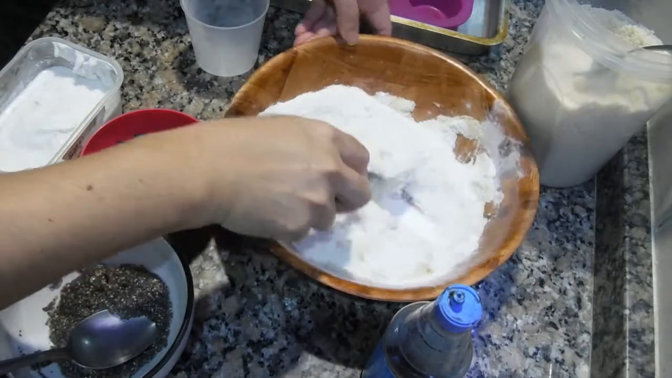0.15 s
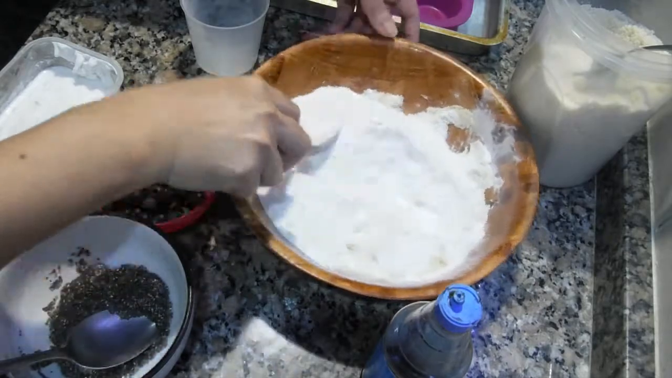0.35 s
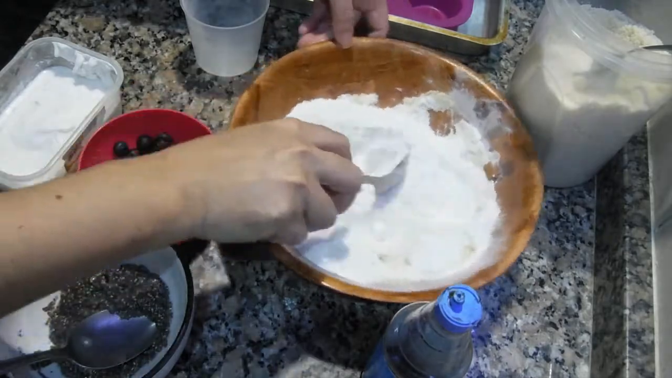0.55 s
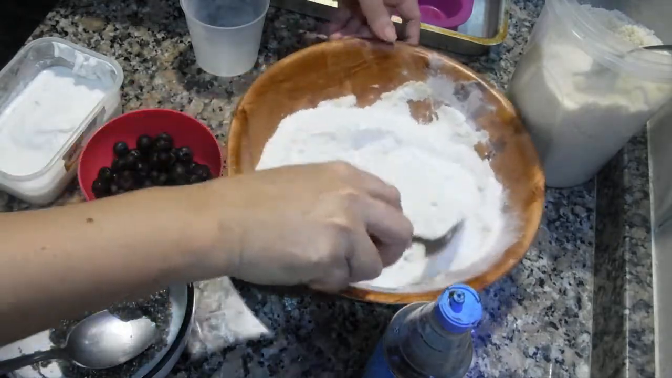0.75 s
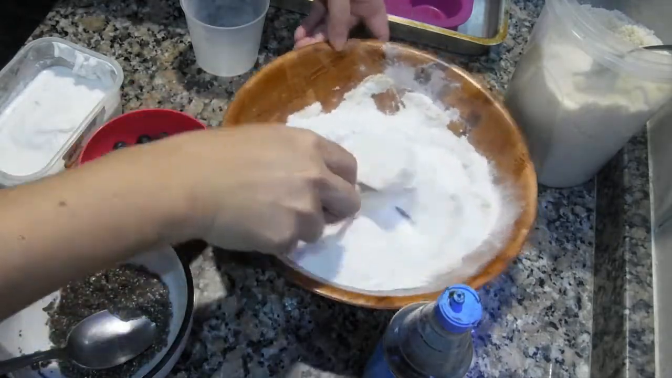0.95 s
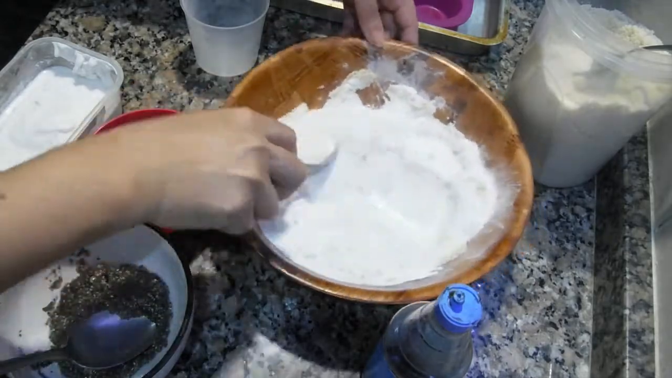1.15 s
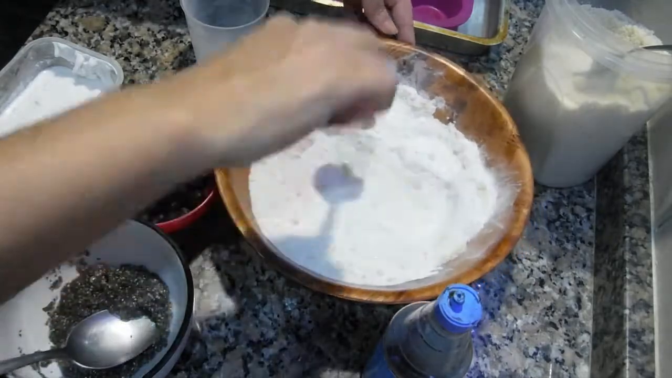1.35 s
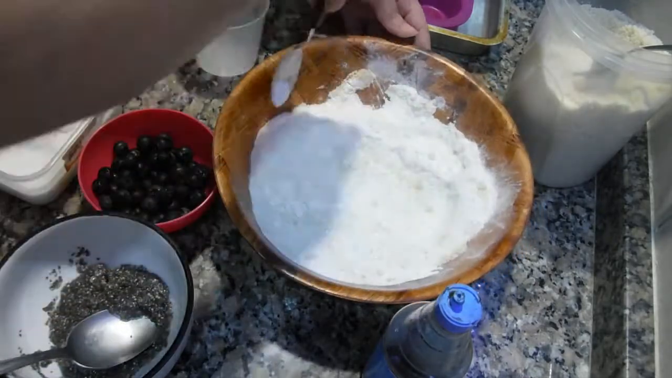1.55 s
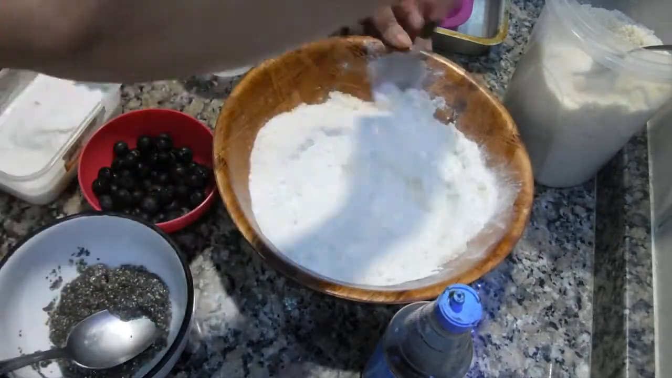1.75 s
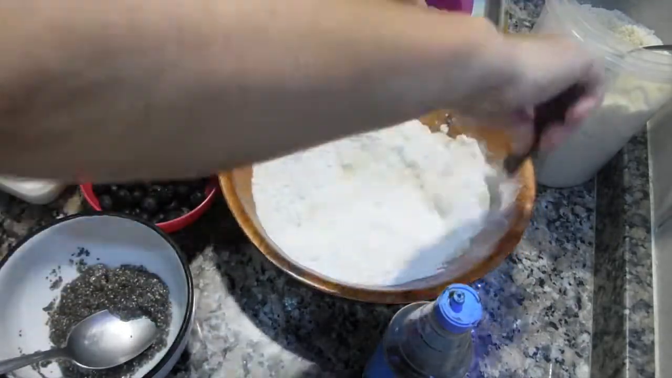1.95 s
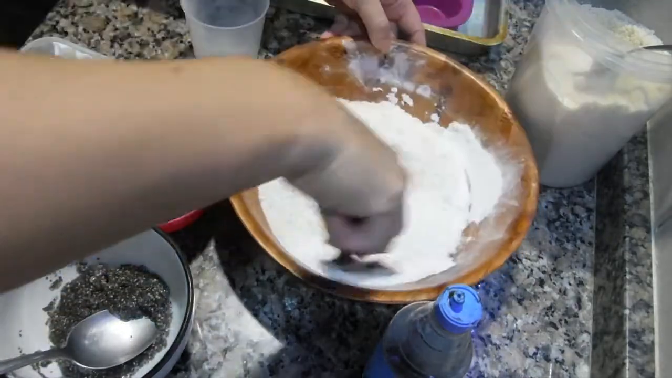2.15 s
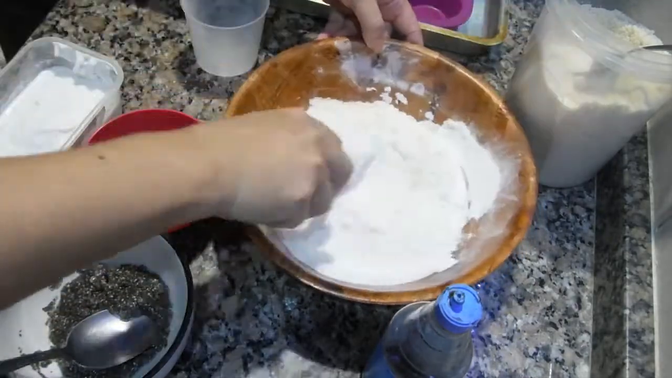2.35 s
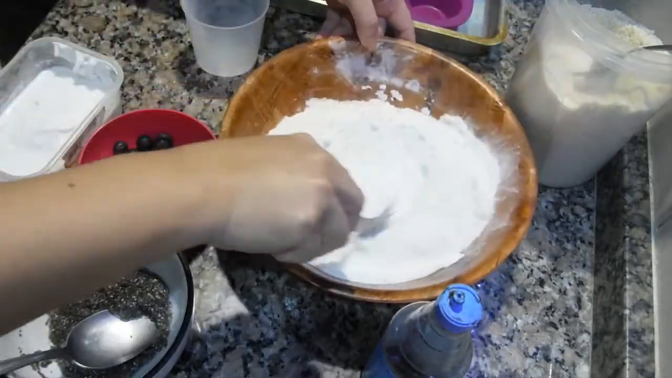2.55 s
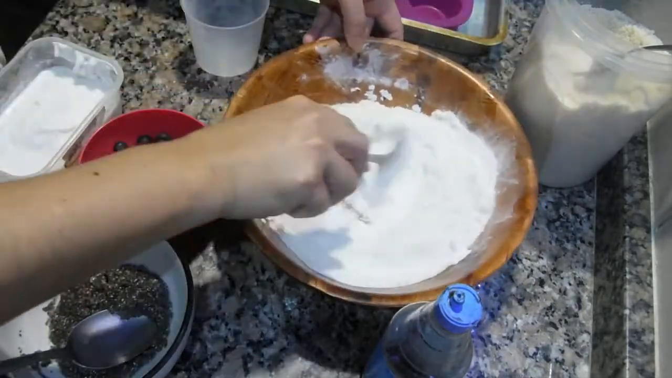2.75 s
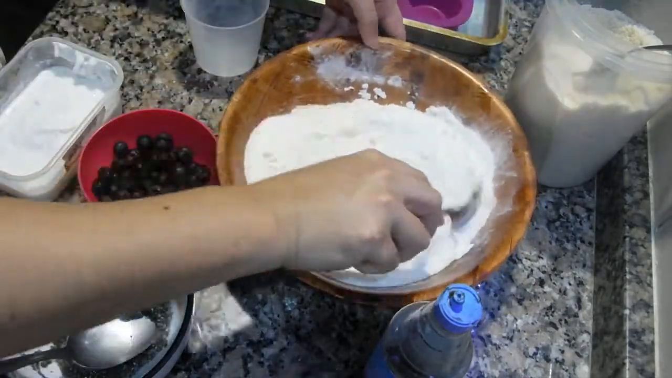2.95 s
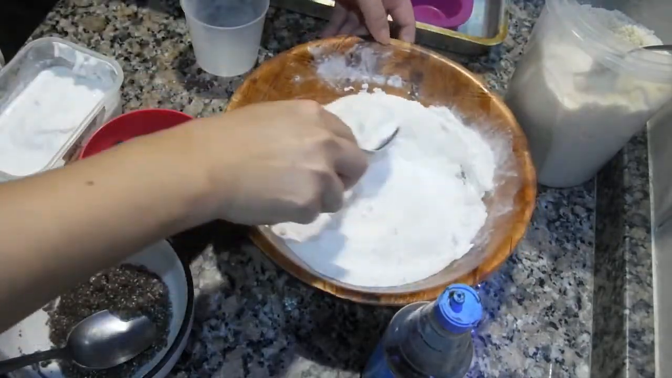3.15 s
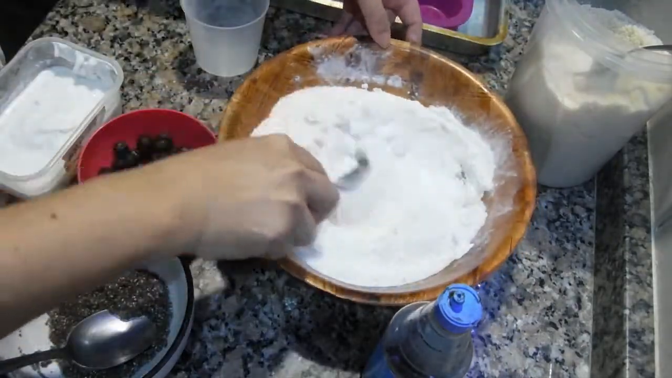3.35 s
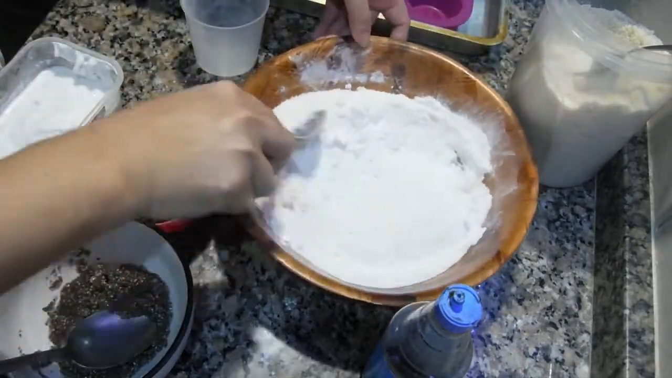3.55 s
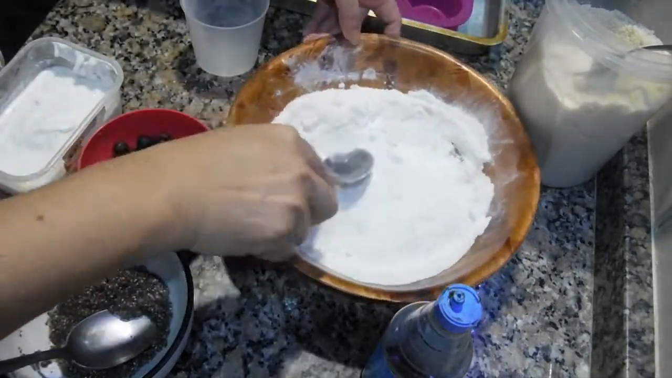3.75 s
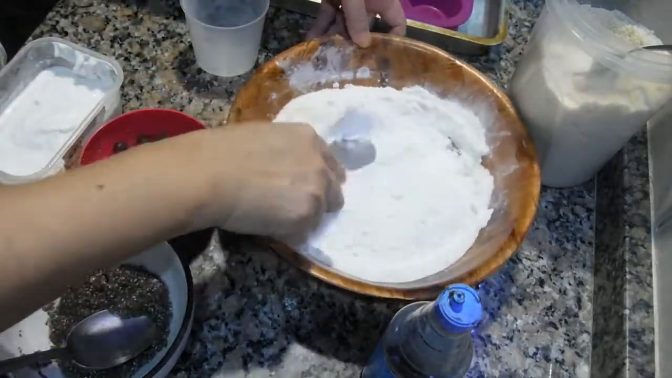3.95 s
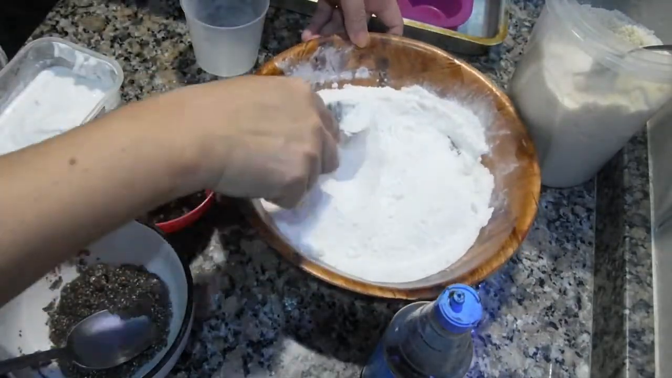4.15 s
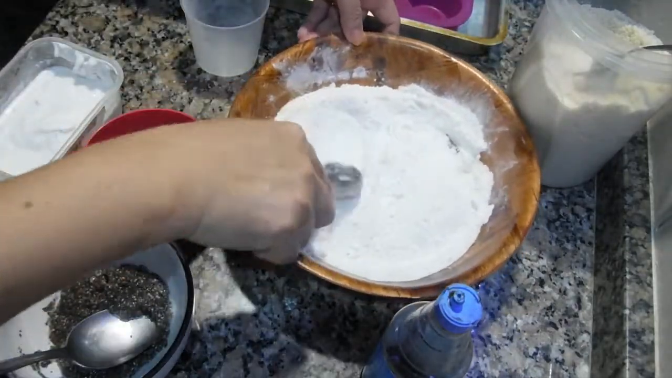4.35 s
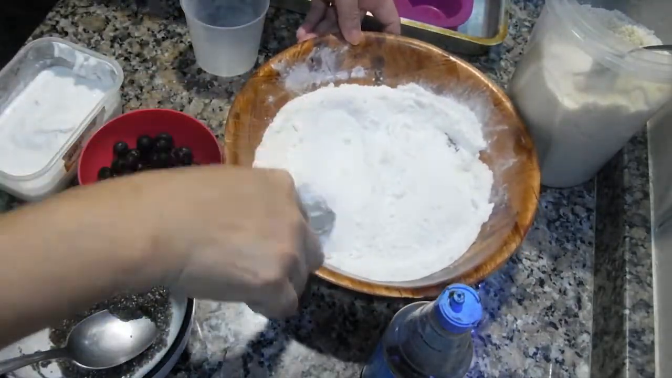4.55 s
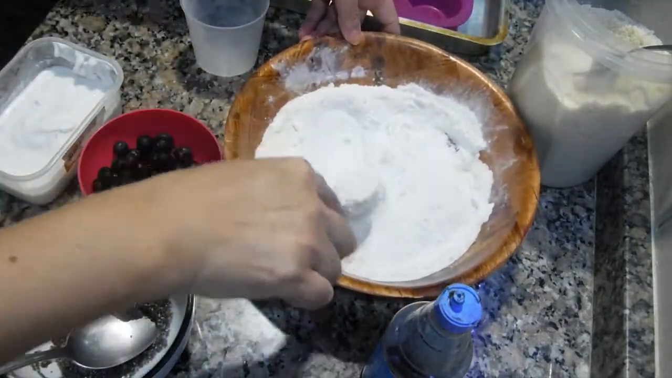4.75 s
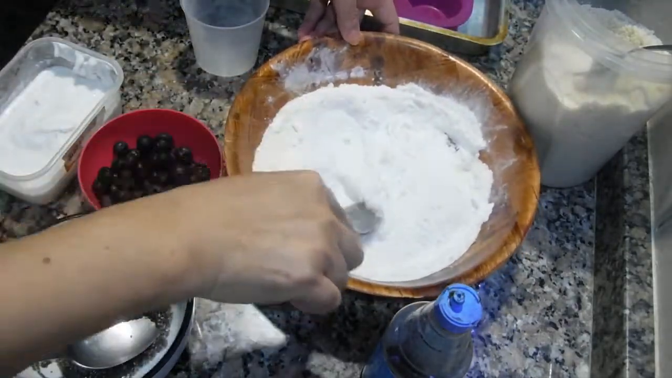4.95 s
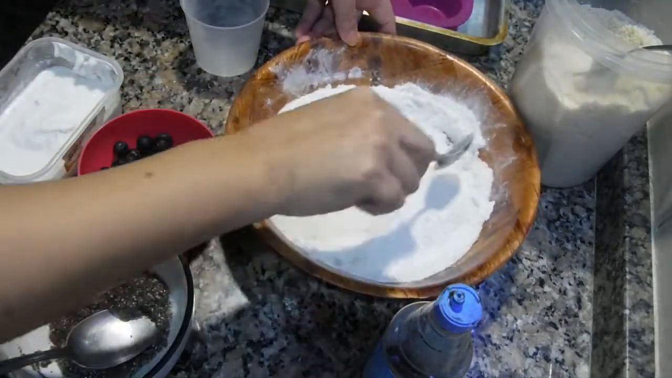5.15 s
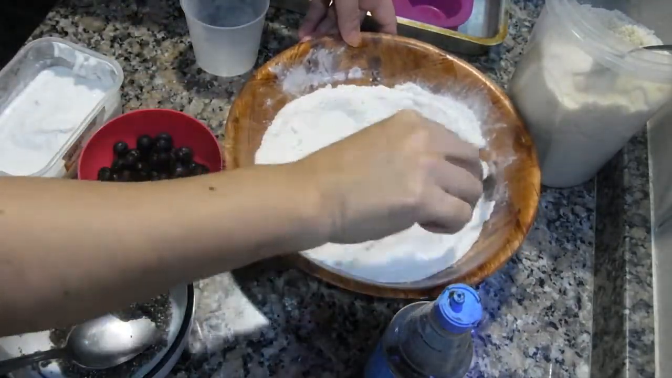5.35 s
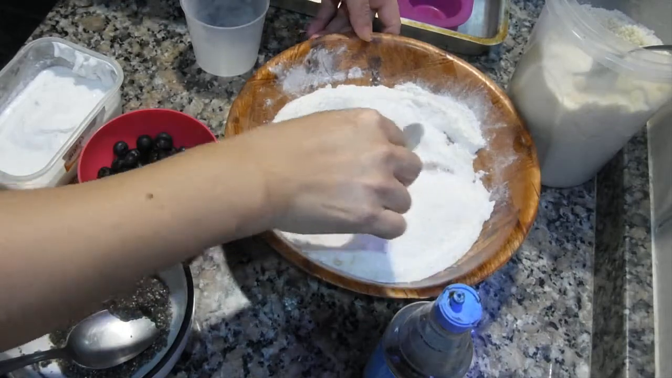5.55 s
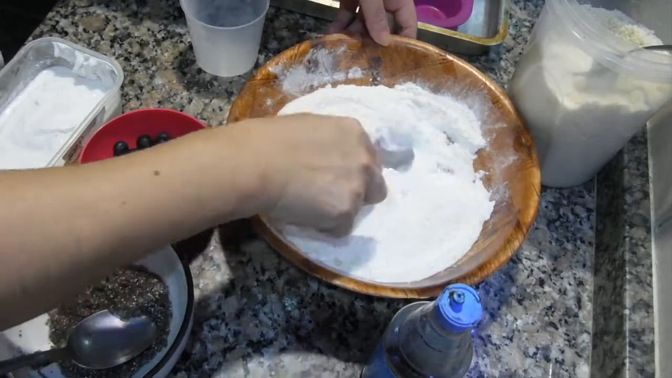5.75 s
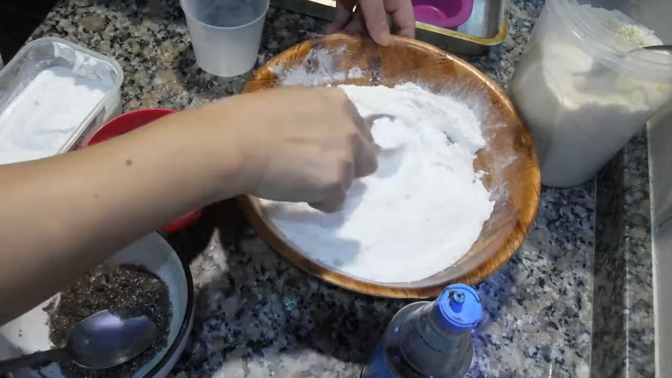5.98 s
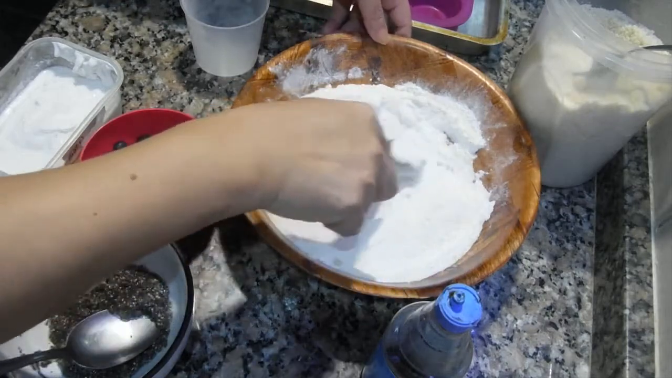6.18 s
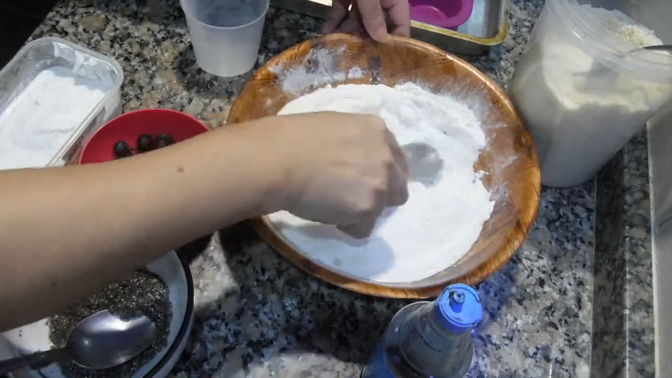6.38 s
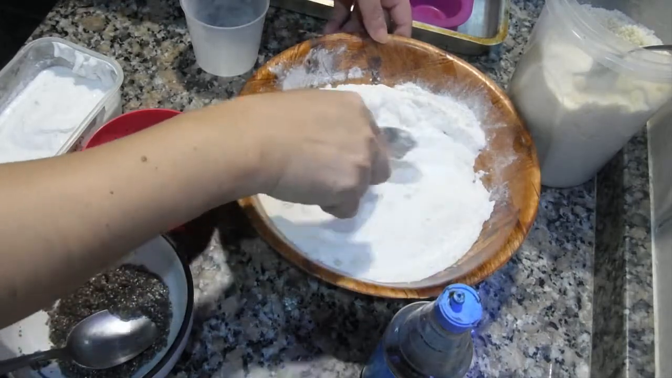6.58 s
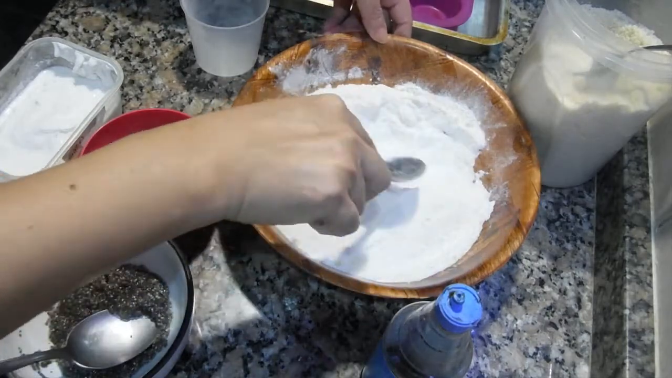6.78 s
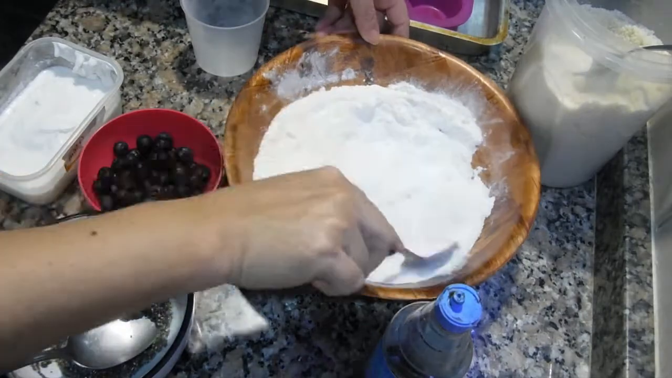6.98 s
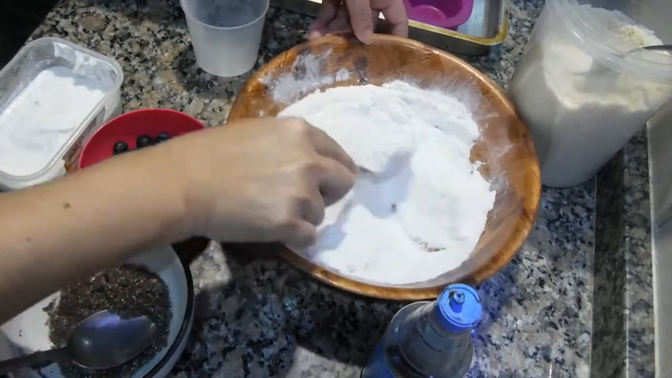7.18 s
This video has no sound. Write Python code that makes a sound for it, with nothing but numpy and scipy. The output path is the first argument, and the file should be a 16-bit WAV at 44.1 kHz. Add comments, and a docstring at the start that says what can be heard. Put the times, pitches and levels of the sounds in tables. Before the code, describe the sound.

Close, irregular steel-on-wood clicks and gritty scrapes, one long rough sweep around the bowl, powdery flour hiss, and quiet room noise beneath.

```python
"""A steel spoon stirs dry flour in a wooden bowl on a stone counter, close to the microphone.
Taps of its edge are short blows, and scrapes are dense small friction slips; both ring the resonances
of spoon and bowl, and now and then the bowl thuds as it rocks on the counter.
The flour swishes softly as shaped noise over the hum of a small kitchen, and the walls add a faint
reverberation to the spoon and bowl."""
import sys
import numpy as np
from scipy import signal
from scipy.fft import rfft, irfft, next_fast_len
from scipy.io import wavfile
from scipy.ndimage import map_coordinates

SR = 44100
rng = np.random.default_rng(int(sys.argv[2]) if len(sys.argv) > 2 else 0)


def store_pcm(level_fs):
    """Save levels as 16-bit WAV."""
    pcm = np.round(np.clip(level_fs, -1, 1) * 32767).astype(np.int16)
    wavfile.write(sys.argv[1], SR, np.atleast_2d(pcm).T)


N = 318402

# Resonances of the spoon (edge, flank, tip) and of the wood (bowl, base).
# Each row: frequency in Hz, width in Hz, relative level in dB.
EDGE_MODES = [(3720, 170, -11), (4210, 310, 3), (4350, 153, 4.5), (4573, 280, 1), (4900, 166, -0.5),
              (5250, 110, 2), (5350, 170, -0.5), (5680, 270, 1.5), (6230, 124, 3.5), (6227, 367, 6),
              (6420, 510, -14)]
FLANK_MODES = [(2086, 360, 10.5), (2172, 190, 12.5), (2506, 440, 5.5), (2900, 147, 5), (3200, 284, 5),
               (3770, 93, -5)]
TIP_MODES = [(7270, 810, -2.5), (8200, 730, -5.5), (9210, 200, -5), (9620, 960, -12), (11800, 700, -13),
             (13300, 2200, -15.5)]
BOWL_MODES = [(455, 93, -2), (636, 184, 2), (813, 30, 3), (888, 38, 0), (1253, 166, 0), (1406, 144, 0.5),
              (1710, 240, -5.5)]
BASE_MODES = [(125, 17.5, -5.5), (165.7, 25.4, -1.5), (226, 51, -4), (348, 41, -7.5)]


def amp(db):
    """Amplitude ratio from the decibel law."""
    return 10 ** (np.asarray(db) / 20)


def unit(x):
    """Normalization by the root mean square, to rms 1."""
    return x / np.sqrt(np.mean(x ** 2) + 1e-20)


def along(points, hz):
    """Linear interpolation of (Hz, value) points on a logarithmic frequency axis."""
    f, v = np.transpose(points)
    return np.interp(np.log(hz + 1), np.log(f + 1), v)


def track(rows, col=1):
    """Linear interpolation in time: one column of (s, ..) rows as a value per sample."""
    rows = np.asarray(rows)
    return np.interp(np.arange(N) / SR, rows[:, 0], rows[:, col])


def latest(rows, early):
    """Sample and hold: the columns of the newest (s, ..) row, which takes over early s ahead."""
    rows = np.asarray(rows)
    newest = np.searchsorted(rows[:, 0], np.arange(N) / SR + early) - 1
    return rows[np.clip(newest, 0, None)].T


def wobble(rate):
    """Slow random modulation: a smooth curve through Gaussian knots, rate of them a second."""
    knots = rng.standard_normal(int(N * rate / SR) + 4)
    return map_coordinates(knots, [np.arange(N) * rate / SR])


def filtered(x, response):
    """Linear filtering: the spectrum of x times a complex response of frequency."""
    m = next_fast_len(N + 8192)
    spectrum = rfft(x, m) * response(np.fft.rfftfreq(m, 1 / SR))
    return irfft(spectrum, m)[..., :N]


def rung(modes, force, centre_hz=None, spread=1, shifty_db=0):
    """Modal superposition: a force drives parallel resonances, hardest near centre_hz (spread in log Hz)."""
    hz, width, db = np.transpose(modes)
    noise_power = amp(db) ** 2 * width * np.pi / SR  # what each resonance passes of white noise
    drives = []
    for c in hz:
        drive = 1
        if centre_hz is not None:
            drive = np.exp(-(np.log(c / centre_hz) / np.clip(spread, .03, 1)) ** 2) + .32
        if shifty_db:
            drive = drive * amp(shifty_db * wobble(36))
        drives.append(drive)
    # the summed mode powers, overlap neglected, are held at 1
    total = np.sqrt(sum(p * d ** 2 for p, d in zip(noise_power, drives)))

    ringing = np.zeros(N)
    for k, (c, w) in enumerate(zip(hz, width)):
        mode = filtered(force * drives[k] / total, lambda f: 1j * f * w / (c * c - f * f + 1j * f * w))
        ringing += (-1) ** k * amp(db[k]) * mode  # neighbours alternate in sign
    return ringing


def slips(per_s, spread_db, smooth, clump_db):
    """Stick-slip friction: small slips of uneven size come in clumps, over a smooth share of rubbing."""
    size = amp(spread_db * np.clip(rng.exponential(size=N), 0, 5)) * rng.standard_normal(N)
    grains = unit(size * (rng.random(N) < per_s / SR))
    clumps = amp(clump_db * (wobble(140) + 0.13 * wobble(45)))
    return unit((grains + smooth * rng.standard_normal(N)) * clumps)


def kitchen():
    """Background noise: shaped room air, an appliance's whirr, a wandering low rumble and a faint high tone."""
    # Spectrum of the room air. Each row: frequency in Hz, relative density in dB.
    air_spectrum = [(15, -40), (25, 0), (76, -8), (114, -4), (230, -9), (450, -9), (700, -14),
                    (1000, -13.5), (1800, -19.5), (2600, -21), (5000, -23.5), (10000, -25.5), (16000, -27)]
    # An appliance's narrow rush. Each row: frequency in Hz, width in Hz, relative level in dB.
    whirr_modes = [(1400, 126, 0)]
    # A low rumble around 54 Hz whose level wanders irregularly.
    # Each row: time in seconds, level in dB.
    rumble_levels = [(0.0, -55), (0.4, -68), (1.7, -63), (2.2, -56), (2.5, -64), (4.2, -61), (4.74, -59),
                     (5.3, -64.5), (7.22, -60.5)]

    air = unit(filtered(rng.standard_normal(N), lambda hz: amp(along(air_spectrum, hz))))
    broad_rush = rung([(1400, 1030, 0)], rng.standard_normal(N))
    whirr = unit(rung(whirr_modes, broad_rush)) * amp(.7 * wobble(4))
    rumble = unit(rung([(53.7, 36, 0)], rng.standard_normal(N)))
    phase = 2 * np.pi * 13690 * np.arange(N) / SR + .8 * wobble(30)
    whine = amp(-84) * np.sin(phase)
    steady = amp(-55.5 + 0.33 * wobble(2.94)) * air + amp(-62) * whirr + whine
    return steady + amp(track(rumble_levels)) * rumble


def flour():
    """Granular noise: many small slips of fine powder hiss in slightly uneven swishes."""
    # Spectrum of the powder's hiss. Each row: frequency in Hz, relative density in dB.
    powder_spectrum = [(1060, -47), (1800, -26), (2100, -11), (2770, -7.5), (3630, -4), (5120, -1),
                       (7540, -8.5), (8320, -14), (15500, -24)]
    # Swishes of flour off the spoon. Each row: loudest moment in seconds, level in dB,
    # swell and fade in seconds over 20 dB.
    swishes = [(.02, -54.5, .02, 0.051), (.21, -53, .1, 0.16), (.293, -53.5, .03, 0.027),
               (.63, -50.5, .15, 0.11), (.845, -56, .05, 0.088), (1.01, -51.5, 0.11, 0.18),
               (1.135, -49.5, .05, .015), (1.241, -52.5, .11, 0.07), (1.383, -56.5, 0.093, 0.033),
               (1.557, -67, .15, .2), (2.45, -45, .1, 0.13), (2.79, -51.5, 0.097, 0.12),
               (2.99, -54.5, .12, 0.07), (3.22, -59, 0.13, 0.21), (3.355, -52.5, 0.11, .14),
               (3.72, -59.5, 0.065, .2), (3.85, -56.5, .03, 0.074), (4.03, -54, .2, 0.14),
               (4.305, -49.5, 0.05, 0.079), (4.67, -49, .13, 0.089), (4.93, -47.5, 0.02, 0.038),
               (4.98, -55.5, 0.042, 0.063), (5.244, -61, .02, .08), (5.465, -51, 0.027, 0.055),
               (5.57, -49.5, 0.061, 0.15), (5.71, -56, .1, .11), (5.822, -51, .035, .025),
               (5.866, -50.5, 0.05, 0.053), (6.11, -51, 0.062, 0.11), (6.52, -57, .05, 0.14),
               (6.70, -53.5, .025, 0.12), (6.955, -59, 0.028, 0.16), (7.21, -51, 0.043, .1)]
    rest_db = -69.5

    grains = slips(per_s=5800, spread_db=4.0, smooth=2.0, clump_db=1.4)
    hiss = unit(filtered(grains, lambda hz: amp(along(powder_spectrum, hz))))
    t = np.arange(N) / SR
    power = amp(2 * rest_db)
    for s, db, swell, fade in swishes:
        from_peak = (t - s) / np.where(t < s, swell, fade)
        power = power + amp(2 * (db - 20 * from_peak ** 2))
    return np.sqrt(power) * amp(1.6 * wobble(25)) * hiss


def pressure(strokes):
    """Friction scales with contact force: each stroke swells, holds with a drift and dies on lifting."""
    rise_db, lift_db_per_s = 15.5, 1000
    power, t = np.zeros(N), np.arange(N) / SR
    for s, rise, hold, db, drift_db, *_ in strokes:
        end, end_db = s + rise + hold, db + drift_db
        times = [s, s + rise, end, end + .2]
        levels_db = [db - rise_db, db, end_db, end_db - .2 * lift_db_per_s]
        power += amp(2 * np.interp(t, times, levels_db)) * (t >= s)
    return np.sqrt(power)


def contact():
    """Modal coupling at the contact point, per sample.

    Returns pressure gain; bowl, flank, base and tip dB; spread; favoured edge, bowl and flank Hz.
    """
    # Short strokes along the wood. Each row: contact, rise and hold in seconds, pressure in dB,
    # its drift over the hold in dB, bowl, flank, base and tip in dB re edge (bowl, flank and base
    # before the landing boost), strongest ring of edge, of bowl and of flank in Hz.
    strokes = [(.040, 0.0021, 0.11, -31.5, 0, -14.5, -7, -13.5, -9.5, 5200, 855, 2840),
               (.425, 0.028, 0.055, -34, -1, -11, -4, -16.5, -8, 5530, 1010, 3200),
               (.526, 0.0095, 0.023, -36, -3, -15, -2.5, -22, -4, 5250, 770, 2650),
               (.846, 0.0047, 0.018, -47.5, 3, -8, -7, -2, -11, 5090, 824, 2670),
               (.872, 0.0071, 0.046, -23.5, -0.5, -12, -3, -26, -11, 5540, 920, 2850),
               (1.086, .004, .01, -43, -3, -18, -8, -18, -13, 4350, 850, 3250),
               (2.504, 0.0049, 0.048, -37.5, -2.5, -7.5, -5, -16, -7.5, 5680, 720, 2860),
               (2.57, 0.056, 0.031, -30, -4, -17, -5.5, -17.5, -10, 5030, 1200, 2420),
               (2.655, 0.01, 0.044, -28, 0, -15.5, -5, -24, -9, 5030, 1630, 2990),
               (2.752, 0.0088, .004, -34, -3.5, -22, -5.5, -18, -6, 5200, 1340, 3170),
               (3.016, 0.0038, 0.087, -29, 1, -10.5, -8, -17.5, -12.5, 4960, 1065, 2860),
               (3.655, 0.0024, 0.037, -32, -15, -17, -10, -22.5, -7, 5000, 1090, 2940),
               (5.412, 0.0041, 0.0096, -31, -3.5, -12.5, -12.5, -20, -9, 5250, 900, 3380),
               (5.478, 0.0046, .037, -31.5, 7, -11, -4.5, -18, -9, 5250, 860, 2960),
               (6.408, .005, 0.015, -35.5, -5.5, -6, -4, -4.5, -9, 5170, 1400, 3200),
               (6.428, .012, 0.022, -23.5, -4, -9.5, -6, -25, -16, 5200, 1040, 3070),
               (7.006, 0.0056, 0.031, -43.5, -3, -20, -12, -14, -13, 5500, 945, 3080),
               (7.046, 0.0089, .068, -27.5, 2, -17, -7.5, -25, -16, 5600, 1030, 2450),
               (7.126, 0.0027, 0.029, -17, -11, -19, -8, -29, -10, 5440, 1540, 2900)]
    # One long sweep round the wall, with a fresh push part way. Each row: time in seconds,
    # pressure in dB, bowl and flank in dB re edge, strongest ring of edge and of bowl in Hz.
    sweep = [(1.68, -36, -2, 0, 5000, 1050), (1.708, -29.5, -15, -10, 5470, 1050),
             (1.762, -28, -12, -11, 5570, 1010), (1.766, -26, -16, -15, 5400, 995),
             (1.812, -29.5, -14, -8, 5300, 1110), (1.82, -21.5, -10.5, -9, 4950, 1160),
             (1.844, -21.5, -11, -13, 4960, 1130), (1.862, -24, -12, -10, 4970, 1020),
             (1.906, -27, -8, -10.5, 5350, 1260), (1.978, -32, 10.5, -3, 5100, 1200),
             (1.996, -25, -2, -9.5, 5000, 1180), (2.052, -31, -8, -10, 4910, 1240),
             (2.092, -24.5, -10, -10, 4900, 1240), (2.124, -31.5, -10.5, -10.5, 4900, 1330),
             (2.19, -29, -3.5, -1, 5140, 1310), (2.198, -20.5, -5, -3, 5040, 1300),
             (2.21, -29, -4, -7, 4960, 1320), (2.26, -20.5, -12, -9.5, 4620, 1340),
             (2.352, -25.5, -13, -7, 5250, 1160), (2.398, -33.5, -13.5, -16, 5100, 1030),
             (2.44, -52, -10, -7, 5070, 1130)]
    landing_db, landing_s = 8.5, 0.017  # initial boost of wood and flank, and its time constant

    t = np.arange(N) / SR
    s, *_, bowl_db, flank_db, base_db, tip_db, edge_hz, bowl_hz, flank_hz = latest(strokes, early=.001)
    landing = landing_db * np.exp(-np.clip(t - s, 0, None) / landing_s)
    short = [pressure(strokes), bowl_db + landing, flank_db + landing / 2, base_db + landing, tip_db,
             0.18, edge_hz, bowl_hz, flank_hz]

    level_db, wood_db, side_db, steel_hz, wood_hz = (track(sweep, col=k) for k in range(1, 6))
    # base -24 dB, tip -10.5 dB, spread 0.12 in log Hz, flank 2970 Hz
    long = [amp(level_db), wood_db, side_db, -24, -10.5, .12, steel_hz, wood_hz, 2970]
    sweeping = (t > sweep[0][0] - .003) & (t < sweep[-1][0])
    return [np.where(sweeping, a, b) for a, b in zip(long, short)]


def taps():
    """Impact excitation: a blow and its chatter ring the steel; the bowl answers a moment later."""
    # Taps of the edge on the wood. Each row: time in seconds, relative strength in dB,
    # bowl, flank and tip in dB re that strength, strongest ring of edge in Hz.
    tap_rows = [(0.0331, -0.5, -12, -14.5, -3.5, 4800), (0.041, -13, -16, -3.5, -9, 5130),
                (0.1456, -14.5, -16, -4, -23, 5140), (0.2907, -34, -16, -13, -22, 4030),
                (0.4192, -44, -2, -1, -9, 5600), (0.4479, -20, -15.5, -8, -18, 5720),
                (0.5402, -26, -22, -16, -15, 5250), (0.5454, -22, -11, -8.5, -3, 4800),
                (0.874, -7.5, -9.5, -1.5, -17, 5400), (0.9152, -17, -14, -9, -20, 5400),
                (1.087, -38, -15, -11, -17, 3870), (1.6775, -18.5, -9, -0.5, -16, 4600),
                (1.8183, -10.5, -18.5, -16, -20, 5200), (1.8417, -8, -36, -21, -17, 4650),
                (2.149, -14, -19, -7, -5, 4820), (2.1946, -16.5, -27, 2, -7, 4580),
                (2.3014, -13, -26, -7.5, 1, 5270), (2.5062, -25, -33, -6.5, -21, 5520),
                (2.7616, -29, -29, -9, -8, 4950), (3.0155, -14, -3, -11.5, -12, 4930),
                (3.0294, -23, -14, -19, -23, 4830), (3.0584, -20, -9, -11, -24, 5460),
                (3.6533, -16, -17.5, -12, -16, 5350), (3.8475, -37.5, -11, -7, -20, 4350),
                (4.926, -41, -14, -19, -17, 4070), (5.4136, -24.5, -23, -15, -20, 4590),
                (5.4284, -25, -20, -19, -20, 5240), (5.4801, -22, -3.5, -11, -19, 5530),
                (5.4929, -20.5, -5.5, -15, -21, 4670), (5.5064, -13.5, -28, -19, -20, 6240),
                (5.5144, -14.5, -24, -8, -8, 5290), (5.8197, -39, -12, -15, -16, 5560),
                (6.4089, -11, -7, -9, -12.5, 4400), (6.4566, -16.5, -32, -6, -26, 4180),
                (6.6922, -39, -14, -15, -17, 5400), (7.0085, -39, -19, -11, -8, 5650),
                (7.0594, -10.5, -21.5, -23, -19, 5160), (7.1058, -16, -24, -18, -14, 5640),
                (7.126, -8, -29, -13, -19, 5980), (7.1353, -7.5, -21.5, -9, -30, 4100),
                (7.1419, -8.5, -25, -15, -24, 3980), (7.1518, -12, -25, -21, -21, 5800)]
    # The bowl rocks on the counter. Each row: time in seconds, relative strength in dB,
    # strongest ring in Hz.
    thud_rows = [(.861, -25, 212), (.878, -22.5, 125), (2.528, -37, 240), (2.693, -32.5, 229)]

    edge, flank, tip, wood, base = np.zeros((5, N + SR // 10))
    t = np.arange(SR // 50) / SR
    for s, db, bowl_db, flank_db, tip_db, _ in tap_rows:
        t60 = 0.002 * amp(0.39 * max(-31 - db, 0))  # s; light touches land on flour and smear out
        chatter = 0.43 * rng.standard_normal(len(t))
        strike = (t == 0) * amp(0.22 * (db + 14))
        blow = amp(-60 * t / t60) * (chatter + strike)
        blow *= amp(db + 16.5) / np.linalg.norm(blow)
        start = round((s + .0005) * SR)
        for part, part_db in ((edge, 0), (flank, flank_db), (tip, tip_db)):
            part[start:][:len(t)] += amp(part_db) * blow
        wood[round((s + .0012) * SR)] += amp(db + bowl_db + 20)
    for s, db, _ in thud_rows:
        base[round(s * SR)] += amp(db + 18)

    edge_hz = latest(tap_rows, early=.001)[-1]
    bowl_hz, flank_hz = contact()[-2:]
    steel = rung(EDGE_MODES, edge[:N], edge_hz, spread=0.065)
    steel += rung(FLANK_MODES, flank[:N], flank_hz, spread=0.13)
    steel += rung(TIP_MODES, tip[:N])
    # wood yields, so the blow is not perfectly sharp
    steel = filtered(steel, lambda hz: 1 / (1 + 1j * hz / 6000))
    bowl = rung(BOWL_MODES, wood[:N], bowl_hz, spread=0.47)
    thuds = rung(BASE_MODES, base[:N], track(thud_rows, col=2), spread=0.13)
    return steel + bowl + thuds


def scrapes():
    """Friction excitation: one rough force rings steel and bowl; the moving contact favours different modes."""
    # A light drag that rings a single mode of the edge. Each row: contact, rise and hold in seconds,
    # relative level in dB, drift in dB.
    squeak_strokes = [(1.096, .006, .034, -48.5, -2)]
    catches_per_s, catch_db, catch_scatter_db = 26, 21, 2.5  # jolts on the grain, in dB re pressure

    gain, bowl_db, flank_db, base_db, tip_db, spread, edge_hz, bowl_hz, flank_hz = contact()
    grit = slips(per_s=2500, spread_db=1.5, smooth=1.0, clump_db=1.2)
    force = gain * grit
    caught = rng.random(N) < catches_per_s / SR
    catches = gain * caught * amp(catch_db + catch_scatter_db * rng.standard_normal(N))

    steel = rung(EDGE_MODES, force + catches, edge_hz, spread, shifty_db=2.55)
    steel += rung(TIP_MODES, force * amp(tip_db + 1.4 * wobble(30)))
    flank_force = force * amp(flank_db + 2.35 * wobble(30))
    steel += rung(FLANK_MODES, flank_force, flank_hz, spread=0.11, shifty_db=3.4)
    squeak = rung([(4620, 76, 0)], pressure(squeak_strokes) * amp(4.5) * grit)
    bowl = rung(BOWL_MODES, force * amp(bowl_db), bowl_hz, spread=0.4, shifty_db=3.0)
    base = rung(BASE_MODES, force * amp(base_db))
    return steel + squeak + bowl + base


def room(x):
    """Reverberation by convolution: each frequency of the walls' answer decays at its own rate."""
    # Decay of the walls' answer. Each row: frequency in Hz, time to fall by 60 dB in seconds.
    wall_decay = [(200, 0.51), (2000, 0.35), (6000, 0.21), (14000, 0.18)]
    hz, t, z = signal.stft(rng.standard_normal(SR // 2), SR, nperseg=256)
    decay = amp(-60 * t / along(wall_decay, hz)[:, None])
    tail = signal.istft(z * decay, SR, nperseg=256)[1]
    delayed = np.pad(x, (200, 0))  # samples before the walls answer
    return signal.fftconvolve(delayed, tail / np.linalg.norm(tail))[:N]


def scene():
    """Superposition of spoon and bowl, their reverberation, the flour and the kitchen."""
    # spoon and bowl carry little sound below about 110 Hz
    near = filtered(scrapes() + taps(), lambda hz: (1j * hz / (1j * hz + 110)) ** 2)
    return (near + amp(-12) * room(near) + flour() + kitchen())[None]


def record(dry):
    """Band limiting: an ideal low-pass keeps nothing from 15950 Hz up."""
    return filtered(dry, lambda hz: hz < 15950)


dry = scene()
out = record(dry)
store_pcm(out)
```